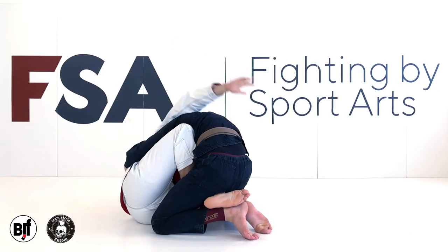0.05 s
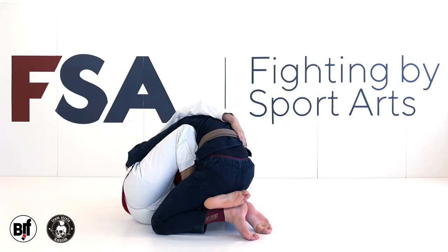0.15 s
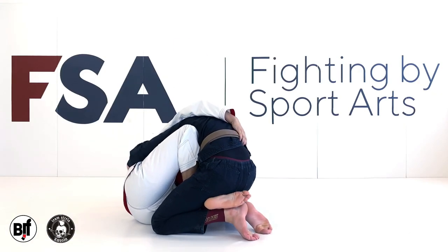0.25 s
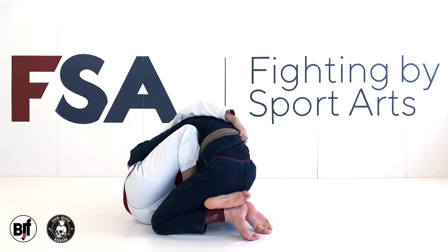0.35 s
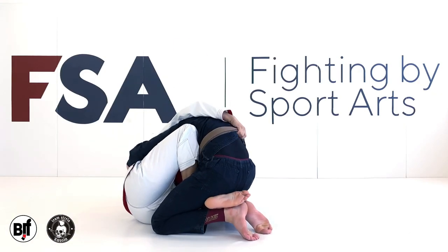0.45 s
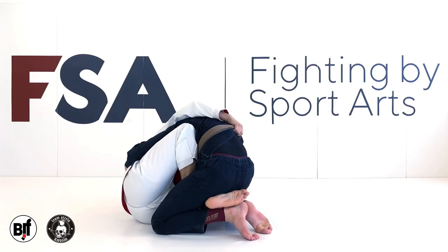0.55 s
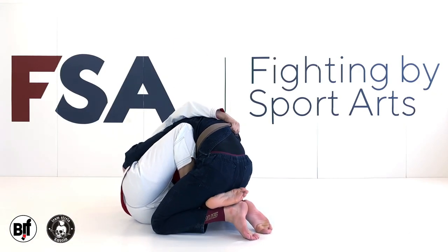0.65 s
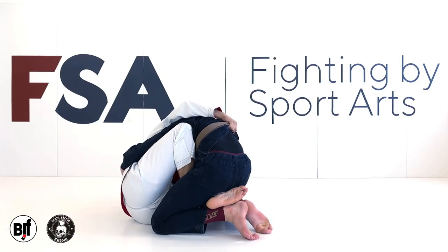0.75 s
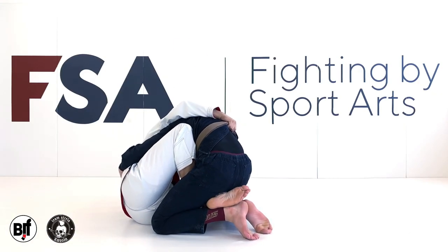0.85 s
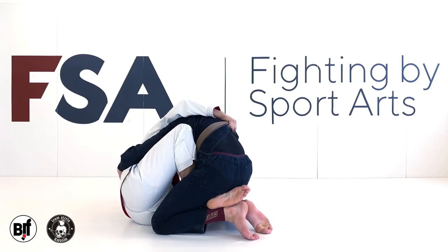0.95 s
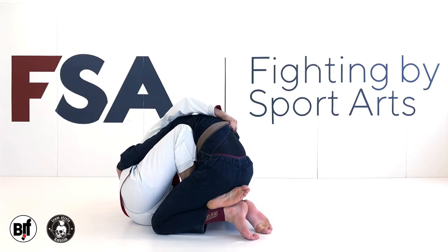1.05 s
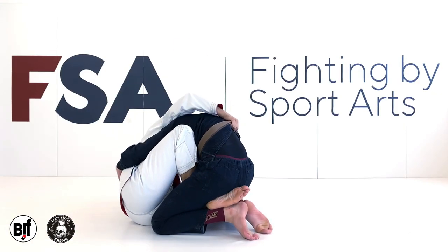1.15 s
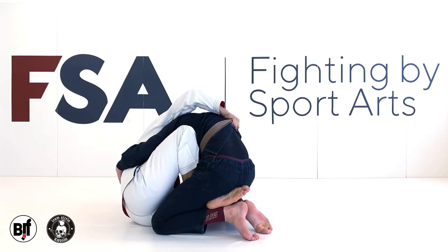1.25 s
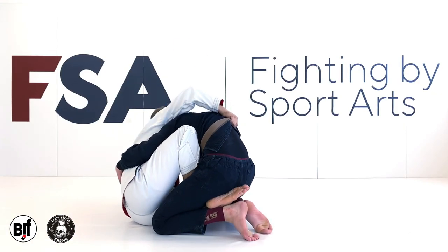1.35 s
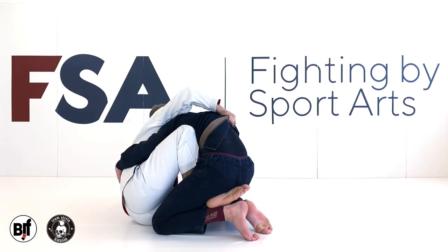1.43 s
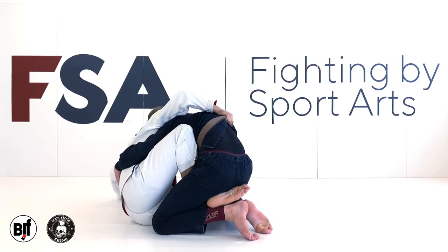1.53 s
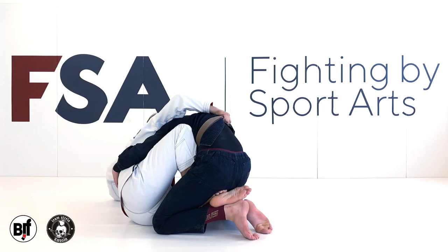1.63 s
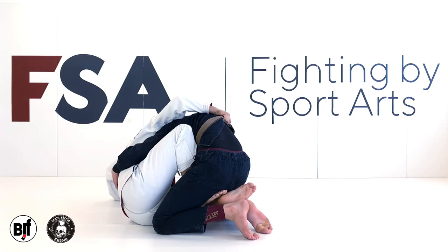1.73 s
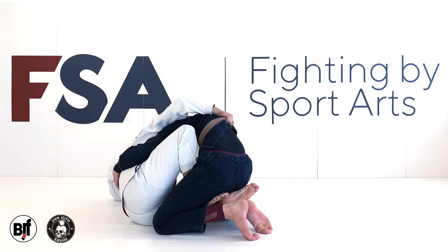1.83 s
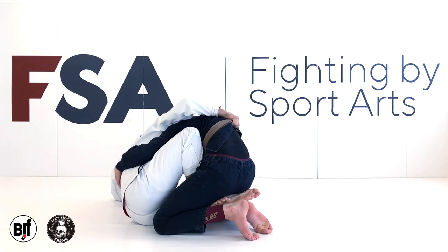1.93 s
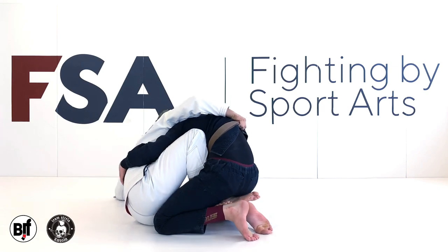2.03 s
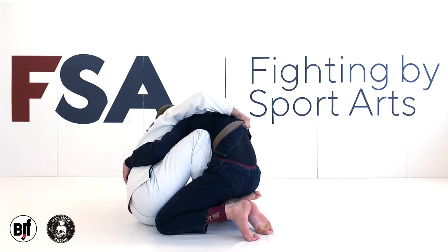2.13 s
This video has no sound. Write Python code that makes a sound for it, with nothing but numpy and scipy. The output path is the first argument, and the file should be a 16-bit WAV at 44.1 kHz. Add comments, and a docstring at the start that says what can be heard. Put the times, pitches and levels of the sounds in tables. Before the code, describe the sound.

One loud, crisp slap echoes in a bare hall, followed by quiet body thuds and cloth rubbing

```python
"""Grapplers on a padded mat

In an echoing gym, filtered noise is a low room rumble, and noise with sparse snags is rustling cotton.
A slap on a back joins noise bursts of cloth and skin to sharp cracks of escaping air.
Bodies thump as damped sines with a dull thud; limbs land flat on the mat as rougher noise bursts.
All but the rumble pass through near echoes and a decaying stereo tail.
"""
import sys
import numpy as np
from scipy import signal
from scipy.fft import rfft, irfft, next_fast_len
from scipy.io import wavfile
from scipy.ndimage import map_coordinates

SR = 44100
rng = np.random.default_rng(int(sys.argv[2]) if len(sys.argv) > 2 else 0)


def wav_record(signal):
    """Record a signal, one row per channel, as 16-bit PCM in the file named by sys.argv[1]."""
    frames = np.transpose(np.atleast_2d(signal))
    bounded = np.clip(frames, -1, 1)
    # unit amplitude maps onto the largest positive 16-bit level
    quanta = np.round(bounded * 32767).astype(np.int16)
    wavfile.write(sys.argv[1], SR, quanta)


N = 97020  # length in samples


def amp(db):
    """Logarithmic level: decibels become a linear gain."""
    return 10 ** (np.asarray(db) / 20)


def unit(x):
    """Power normalisation: scale to rms 1."""
    return x / np.sqrt(np.mean(x ** 2) + 1e-20)


def along(points, hz):
    """Logarithmic frequency scale: interpolate (frequency, value) points on it."""
    f, v = np.transpose(points)
    return np.interp(np.log(hz + 1), np.log(f + 1), v)


def coloured(x, gain):
    """Minimum-phase filtering: a folded cepstrum gives the causal phase for gain(hz)."""
    m = 2 * next_fast_len(x.shape[-1])
    hz = np.fft.rfftfreq(m, 1 / SR)
    cepstrum = irfft(np.log(np.maximum(gain(hz), 1e-6)))
    cepstrum[1:m // 2] *= 2
    cepstrum[m // 2 + 1:] = 0
    response = np.exp(rfft(cepstrum))
    return irfft(rfft(x, m) * response, m)[..., :x.shape[-1]]


def shaped(x, colour):
    """Spectral shaping: filter by (frequency [Hz], gain [dB]) points."""
    return coloured(x, lambda hz: amp(along(colour, hz)))


def add(track, s, sound):
    """Superposition: mix a sound in at time s."""
    part = track[round(s * SR):][:len(sound)]
    part += sound[:len(part)]


# Stereo width of the gym: (frequency [Hz], side over mid [dB])
WIDTH = [(50, -24), (130, 1.5), (300, -4.5), (1000, -2.5), (2500, -2.5), (7000, -1.5), (14000, -4)]


def spread(pair):
    """Mid-side stereo: two unrelated signals give left and right, narrow in the deepest bass."""
    side = shaped(pair[1], WIDTH)
    return np.array([pair[0] + side, pair[0] - side])


# Reverberation time: (frequency [Hz], 60 dB decay time [s])
REVERB_TIME = [(60, 0.71), (160, 1.05), (450, 0.53), (1200, 1.03), (3000, 1.245), (6000, 1), (10000, 0.77),
               (15000, 0.42)]
# Spectrum of the tail: (frequency [Hz], relative echo level [dB])
REVERB_COLOUR = [(50, 2.5), (150, -10), (330, -7), (650, 2.5), (1150, -2.5), (1800, 1.5), (3000, -1),
                 (4200, -2.5), (7000, 0.5), (15000, -3.5)]
# Floor, wall and ceiling echoes: (delay [s], relative left level [dB], relative right level [dB])
REFLECTIONS = [(.010, -15.5, -7), (.0125, -11, -51.5), (.019, -27, -8.5), (.0218, -3, -37),
               (.0238, -39, -26)]
# Spectrum of each near echo: (frequency [Hz], gain [dB])
REFLECTION_COLOUR = [(100, -2), (1500, -4.5), (6500, 2), (14000, -0.5)]


def gym(x, echo_db, build_s=0.0037):
    """Room impulse response: direct sound, near echoes and a tail with a decay for each band."""
    hz, t, noise = signal.stft(rng.standard_normal((2, SR)), SR, nperseg=256)
    t60 = along(REVERB_TIME, hz)[:, None]
    decay_db = along(REVERB_COLOUR, hz)[:, None] - 60 * t / t60
    # longer decays start lower, so the band's level is independent of its decay time
    gain = amp(decay_db) * np.sqrt(np.log(1e6) / (t60 * SR))
    width = amp(np.outer([0, 1], along(WIDTH, hz)))[:, :, None]
    mid, side = signal.istft(noise * gain * width, SR, nperseg=256)[1]
    build_up = 1 - np.exp(-(np.arange(len(mid)) / SR / build_s) ** 2)
    response = np.array([mid + side, mid - side]) * build_up
    mirrored = shaped(np.eye(1, SR // 100)[0], REFLECTION_COLOUR)
    for delay, *sides_db in REFLECTIONS:
        for channel, db in zip(response, sides_db):
            add(channel, delay, amp(db) * mirrored)
    echoes = signal.fftconvolve(x[None], response, axes=1)[:, :N]
    return x + amp(echo_db) * echoes


# Spectrum of the room's low air: (frequency [Hz], gain [dB])
RUMBLE_COLOUR = [(20, -15), (35, -4), (50, -4), (95, -3), (180, -6.5), (350, -12), (1000, -16.5),
                 (4000, -26), (15000, -41.5)]


def rumble(level_db=-61.5):
    """Stationary noise: the steady low air of the building, weighted towards the bass."""
    air = shaped(rng.standard_normal((2, N)), RUMBLE_COLOUR)
    return amp(level_db) * unit(spread(air))


# Cloth rubbing as the bodies shift, before flutter and echo: (time [s], level [dB])
RUB_LEVEL = [(0, -85), (.17, -68.5), (.68, -68), (.765, -56.5), (.82, -71.5), (1.1, -74.5), (1.18, -66),
             (1.264, -64.5), (1.277, -49.5), (1.31, -59.5), (1.46, -61.5), (1.56, -72), (1.66, -51),
             (1.8, -56.5), (1.88, -68.5), (2.09, -66), (2.14, -58), (2.175, -56.5), (2.2, -58)]
# Spectrum of rubbing cotton: (frequency [Hz], gain [dB])
RUB_COLOUR = [(80, -19), (250, 6), (700, 2), (1500, -1), (2700, 0.5), (5000, -1.5), (8000, -9.5),
              (12000, -10.5), (16000, -19.5)]


def cloth(fibres_per_s=2500, fibre_db=-3, flutter_db=2.5, flutter_rate_hz=45):
    """Friction noise: a hiss of rubbing cotton with random tiny snags of the weave."""
    t = np.arange(N) / SR
    is_snag = rng.random(N) < fibres_per_s / SR
    snags = is_snag * rng.standard_normal(N) * np.exp(0.62 * rng.standard_normal(N))
    hiss = rng.standard_normal(N)
    rub = unit(shaped(hiss + amp(fibre_db) * unit(snags), RUB_COLOUR))
    # random values, smoothly interpolated
    flutter = map_coordinates(rng.standard_normal(N // 100), [t * flutter_rate_hz])
    level_db = np.interp(t, *np.transpose(RUB_LEVEL)) + flutter_db * flutter
    return gym(rub * amp(level_db), echo_db=-1.5)


def contact(row, colour, rise_s, rough):
    """Damped noise burst: a brief crush of cloth and skin, rolled off above its brightness."""
    s, db, t60, bright_hz = row
    out, t = np.zeros(N), np.arange(SR // 4) / SR
    envelope = amp(-60 * t / t60) * (1 - np.exp(-t / rise_s))
    grain = np.exp(rough * rng.standard_normal(len(t)))  # uneven strength, sample by sample
    crush = rng.standard_normal(len(t)) * grain * envelope
    burst = coloured(crush, lambda hz: amp(along(colour, hz)) / (1 + (hz / bright_hz) ** 2) ** 0.79)
    # the level refers to the envelope, so the filter does not change the loudness
    add(out, s, amp(db) * unit(burst) * np.sqrt(2 * np.mean(envelope ** 2)))
    return out


# Sleeve, fingers and palm arriving: (time [s], relative level [dB], 60 dB decay time [s], brightness [Hz])
SLAP_CONTACTS = [(0.1939, -33.5, 0.045, 2940), (.1995, -41.5, 0.15, 2820), (0.2063, -20, 0.02, 1910),
                 (0.2121, -17.5, 0.016, 4000)]
# Spectrum of the slapping contacts: (frequency [Hz], gain [dB])
SLAP_SPECTRUM = [(40, -6), (120, -1.5), (330, -1.5), (600, -3), (1100, 3), (2000, 2), (3000, -1.5),
                 (3900, 1), (7000, -6), (15000, -5.5)]
# Air bursting out as the palm closes: (time [s], peak of the direct sound [dB])
AIR_BURSTS = [(.2151, -7.5), (.2158, -10)]
# Spectrum of an air burst: (frequency [Hz], gain [dB])
AIR_BURST_COLOUR = [(60, -12), (500, -2), (1100, 0.5), (2000, -4), (3800, 1.5), (5000, 0.5), (7000, -4),
                    (10000, -12.5), (15000, -27.5)]


def slap():
    """Impulsive excitation: sleeve and fingers land, then the palm shuts; each stirs the hall anew."""
    out = np.zeros((2, N))
    for row in SLAP_CONTACTS:
        out += gym(contact(row, SLAP_SPECTRUM, rise_s=0.00054, rough=0.17), echo_db=1.1)
    snap = shaped(np.eye(1, SR // 20)[0], AIR_BURST_COLOUR)
    snap /= np.abs(snap).max()
    for s, db in AIR_BURSTS:
        crack = np.zeros(N)
        add(crack, s, amp(db) * snap)
        out += gym(crack, echo_db=-0.5)
    return out


# Low thumps of bodies and padding:
# (time [s], relative level [dB], pitch [Hz], 60 dB decay time [s], thud rms relative to tone amplitude [dB])
BODY_THUMPS = [(0.2084, -17.5, 119, 0.043, -7), (.74, -51.5, 220, .06, -5), (.777, -50, 90.3, .08, -6),
               (1.165, -48, 199.2, 0.064, -7), (1.252, -35.5, 236, 0.065, -5.5),
               (1.269, -31, 149, 0.081, -20), (1.279, -29.5, 373, 0.059, -17),
               (1.34, -38, 140.9, 0.21, -12), (1.629, -27.5, 197.4, 0.085, -8.5),
               (1.959, -31, 155, 0.093, -22), (1.98, -28, 167, .04, -21), (1.998, -35, 163, 0.059, -15),
               (2.107, -36, 181, 0.083, -13), (2.135, -44.5, 82.7, 0.13, -19)]
# Spectrum of the dull thud: (frequency [Hz], gain [dB])
THUD_SPECTRUM = [(25, -29), (50, -30), (100, -9.5), (250, 6), (500, -9.5), (1500, -5), (6000, -90)]


def thumps(rise_s=0.0029):
    """Damped oscillation: flesh and padding give a few decaying low cycles and a dull thud."""
    out, t = np.zeros(N), np.arange(SR // 3) / SR
    for s, db, hz, t60, thud_db in BODY_THUMPS:
        thud = amp(thud_db) * unit(shaped(rng.standard_normal(len(t)), THUD_SPECTRUM))
        tone = np.sin(2 * np.pi * hz * t)
        envelope = amp(db - 60 * t / t60) * (1 - np.exp(-t / rise_s))
        add(out, s, envelope * (tone + thud))
    return gym(out, echo_db=-3)


# Clothed limbs landing on the mat: (time [s], relative level [dB], 60 dB decay time [s], brightness [Hz])
LIMB_PATS = [(1.209, -43.5, 0.061, 500), (1.221, -43, 0.051, 790), (1.273, -45.5, .11, 1500),
             (1.35, -47, 0.062, 690), (1.614, -47.5, 0.044, 2000), (1.626, -30, 0.061, 800),
             (1.638, -28.5, 0.048, 1620), (1.649, -35, 0.032, 550), (1.661, -37, 0.033, 1020),
             (2.045, -55, 0.31, 600), (2.136, -47, 0.095, 493)]
# Spectrum of a limb on the mat's cover: (frequency [Hz], gain [dB])
PAT_SPECTRUM = [(40, -30), (110, 0.5), (200, -4.5), (330, -2.5), (520, -2.5), (1200, -4), (2200, -5.5),
                (5000, -4), (14000, -2.5)]


def pats():
    """Soft impact: clothed limbs land flat on the mat's cover, with a slower rise than the slap."""
    return sum(gym(contact(row, PAT_SPECTRUM, rise_s=0.0022, rough=0.68), echo_db=0.56) for row in LIMB_PATS)


def scene():
    """Linear superposition: the sounds of movement add to the room's rumble."""
    return rumble() + cloth() + slap() + thumps() + pats()


def record(dry, low_cut_hz=42, top_hz=15850):
    """Band limitation: the microphone drops the deepest bass; nothing is kept from top_hz up."""
    dry = signal.sosfilt(signal.butter(4, low_cut_hz, "highpass", fs=SR, output="sos"), dry)
    m = next_fast_len(N + SR // 2)
    in_band = np.fft.rfftfreq(m, 1 / SR) < top_hz
    return irfft(rfft(dry, m) * in_band, m)[:, :N]


dry = scene()
out = record(dry)
wav_record(out)
```